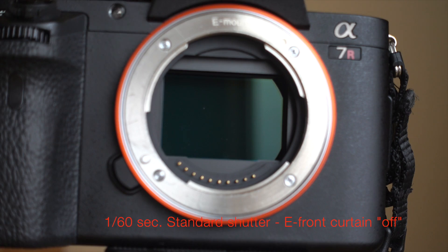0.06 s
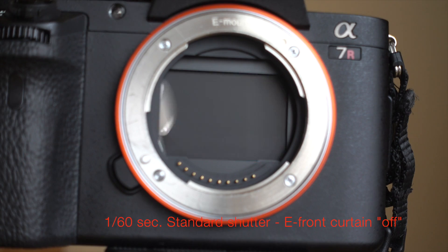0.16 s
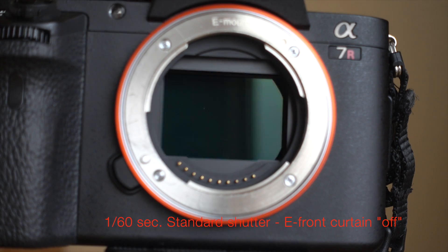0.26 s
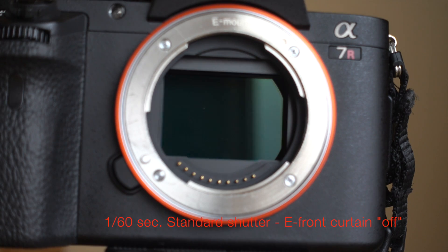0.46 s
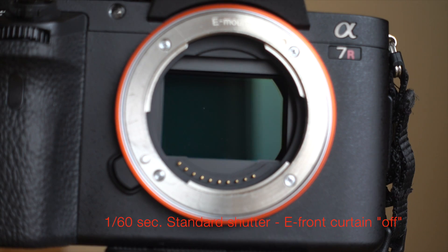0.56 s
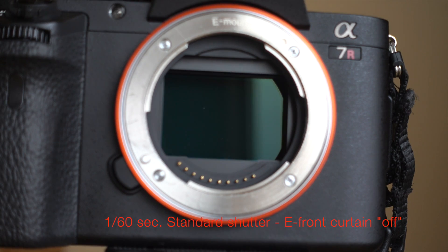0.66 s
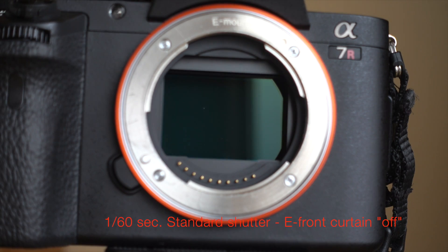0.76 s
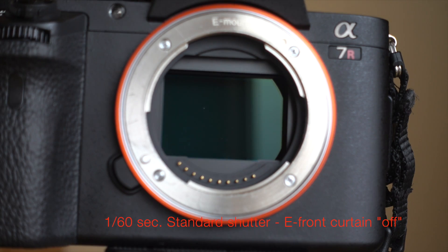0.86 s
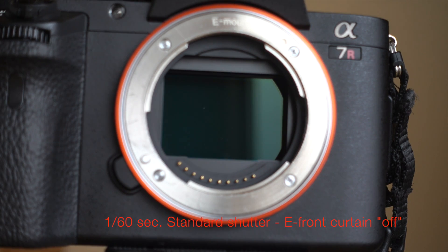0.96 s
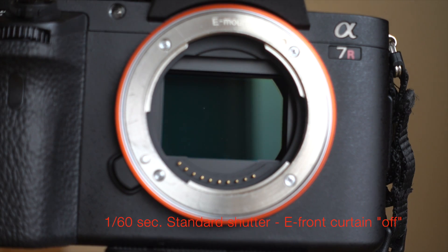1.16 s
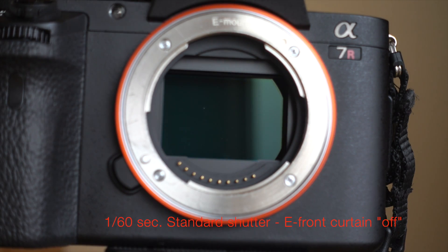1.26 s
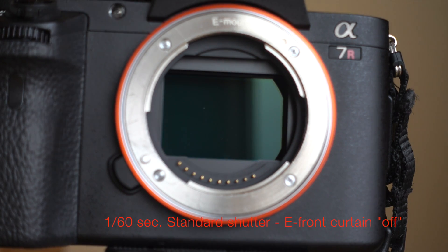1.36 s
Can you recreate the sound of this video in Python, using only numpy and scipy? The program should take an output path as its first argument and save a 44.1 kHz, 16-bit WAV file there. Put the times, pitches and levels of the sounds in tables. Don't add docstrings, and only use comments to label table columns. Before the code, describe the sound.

One mechanical camera shutter cycle in a small quiet room, heard close: faint rustle, crisp clack and clicking latches, tiny gear whirr re-cocking, another sharp clack, then a short reverberant tail over soft hiss and hum.

```python
import sys
import numpy as np
from scipy import signal
from scipy.fft import rfft, irfft, next_fast_len
from scipy.io import wavfile
from scipy.ndimage import uniform_filter1d, map_coordinates

SR = 44100
rng = np.random.default_rng(int(sys.argv[2]) if len(sys.argv) > 2 else 0)


def volts_from_db(level):
    exponent = np.asarray(level, float) / 20
    return 10 ** exponent


def transcribe(u):
    v = np.clip(np.atleast_2d(u).T, -1, 1)
    q = np.round(v * 32767).astype(np.int16)
    wavfile.write(sys.argv[1], SR, q)


N = 61739
OPPOSED = np.array([[1], [-1]])


def along(points, hz):
    f, v = np.transpose(points)
    return np.interp(np.log(hz + 1), np.log(f + 1), v)


def wobble(rate_hz):
    return map_coordinates(rng.standard_normal(N // 8), [np.arange(N) * rate_hz / SR])


def filtered(x, response):
    m = next_fast_len(N + SR // 2)
    return irfft(rfft(x, m) * response(np.fft.rfftfreq(m, 1 / SR)), m)[..., :N]


def tone(points):
    def response(hz):
        gain = volts_from_db(along(points, hz)) * np.minimum(1, hz / points[0][0]) ** 4
        return gain / np.sqrt(np.mean(gain ** 2))
    return response


def even(burst):
    z = rfft(burst)
    power = uniform_filter1d(abs(z) ** 2, size=len(z) // 32)
    flat = irfft(z / np.sqrt(power + 1e-30), len(burst))
    return flat * np.linalg.norm(burst) / np.linalg.norm(flat)


def rattles(rows, colour):
    rise_s, fall_s, spiky_db, sag_db = .00025, .0009, 4, 5
    u = np.maximum(np.arange(-256, 768) / SR, 0)
    out = np.zeros(N)
    for s, db, hold in rows:
        contacts = np.sign(rng.standard_normal(len(u)))
        contacts = contacts * volts_from_db(spiky_db * rng.standard_normal(len(u)))
        onset = 1 - np.exp(-u / rise_s)
        decay = np.exp(-np.maximum(u - hold, 0) / fall_s)
        shape = volts_from_db(db - sag_db * np.minimum(u / hold, 1)) * onset * decay
        out[round(s * SR) - 256:][:len(u)] += even(shape * contacts)
    return filtered(out, tone(colour))


def air():
    # f/Hz, level/dB
    air_tone = [(70, -15), (170, -12), (420, -3.5), (900, -4), (2600, -5.5), (4500, -14), (9000, -15),
                (16000, -21)]
    # f/Hz, side under mid/dB
    air_side = [(60, -30), (200, -29.5), (400, -12.5), (1000, -5), (4000, 1), (15000, -1.5)]
    # f/Hz, level/dB, sway/dB
    hum_lines = [(120, -72, 1.7), (98, -80.5, 4.5), (89, -92, -5), (250, -84.5, 2), (346.3, -73.5, 4),
                 (359.4, -74, 4), (447, -82, 2)]
    # t/s, level/dB
    drift = [(0, -1), (.3, 1.5), (.75, 4), (1.0, 0), (1.4, -1.5)]
    t = np.arange(N) / SR
    colour = tone(air_tone)
    mid = filtered(rng.standard_normal(N), colour)
    side = filtered(rng.standard_normal(N), lambda f: colour(f) * volts_from_db(along(air_side, f)))
    hum = np.zeros(N)
    for hz, db, sway_db in hum_lines:
        phase = 2 * np.pi * hz * t + 0.5 * sway_db * wobble(7.8)
        hum += volts_from_db(db + sway_db * wobble(12)) * np.sin(phase)
    hiss = volts_from_db(-64.5 + 0.47 * wobble(36)) * (mid + side * OPPOSED)
    return volts_from_db(np.interp(t, *np.transpose(drift))) * (hiss + hum)


def wake():
    # start t/s, first rise done t/s, peak t/s, level/dB
    rustle = (.186, .198, .228, -53)
    # f/Hz, level/dB
    wake_tone = [(710, -43), (1200, -24.5), (4080, 5), (5020, -20), (6100, -9.5), (7490, -1.5),
                 (9010, -8.5), (11800, -11), (16000, -27)]
    a, full, b, db = rustle
    on = np.interp(np.arange(N) / SR, [a, full, b, b + 0.0056], [0, 0.85, 3.2, 0.048])
    return on * volts_from_db(db) * filtered(rng.standard_normal(N), tone(wake_tone))


def whir():
    # t/s, level/dB
    motion = [(.226, -90), (.244, -46), (.255, -38), (.3, -41), (.35, -43), (.43, -46), (.46, -38),
              (.51, -38), (.55, -44), (.575, -70)]
    # f/Hz, level/dB
    whir_tone = [(290, -73), (500, -36.5), (1950, -6), (2650, -15), (5970, -24), (7420, -5), (10400, -12.5),
                 (11500, -16), (16000, -10.5)]
    s, db = np.transpose(motion)
    level_db = np.interp(np.arange(N) / SR, s, db, left=-120, right=-120)
    roughness_db = 1.2 * wobble(500)
    return volts_from_db(level_db + roughness_db) * filtered(rng.standard_normal(N), tone(whir_tone))


def curtain_slaps():
    # t/s, level/dB, rattle/s
    slaps = [
        (.2275, -32, .005),
        (.2505, -33, .003),
        (.3015, -33, .005),
        (.3101, -14, .0045),
        (.4835, -30, .004),
        (.505, -31, .004),
        (.5130, -13.5, .0045),
    ]
    # f/Hz, level/dB
    slap_tone = [(500, -28), (1200, -14), (2400, -14.5), (3600, -4.5), (6900, -2), (8300, -4.5),
                 (12000, -3.5), (16000, -0.5)]
    return rattles(slaps, slap_tone)


def cam_knocks():
    # t/s, level/dB, rattle/s
    knocks = [
        (.2285, -49.5, 0.0023),
        (.357, -29, 0.0024),
        (.3955, -30, 0.0052),
        (.5595, -32, 0.0037),
    ]
    # f/Hz, level/dB
    knock_tone = [(500, -30), (750, -9), (1200, -1.5), (1600, -9), (2100, -2.5), (3000, -15.5), (8000, -17),
                  (16000, -43)]
    return rattles(knocks, knock_tone)


def latches():
    # t/s, level/dB, rattle/s
    snaps = [
        (.2335, -31.5, 0.00051),
        (.342, -31, .002),
        (.3478, -16.5, 0.0025),
        (0.5, -31, 0.0011),
        (.5510, -15, 0.0023),
    ]
    # f/Hz, level/dB
    latch_tone = [(290, -50), (500, -31.5), (1190, -21), (2290, 0.5), (3650, -8.5), (7980, 2), (10200, -9),
                  (13400, -8.5), (16000, -18)]
    return rattles(snaps, latch_tone)


def frame_stops():
    # t/s, level/dB, rattle/s
    stops = [
        (.2425, -34, 0.0056),
        (.373, -32, .002),
        (.3788, -17.5, 0.0049),
    ]
    # f/Hz, level/dB
    stop_tone = [(240, -46.5), (400, -24), (1070, -5), (4240, 4.5), (5430, -7), (7750, 6), (9760, -5.5),
                 (13300, -1), (16000, -6)]
    return rattles(stops, stop_tone)


def motor():
    # start t/s, end t/s, first f/Hz, settled f/Hz, level/dB
    runs = [
        (.243, .309, 4080, 3697, -33),
        (.439, .514, 4120, 3125, -30.5),
    ]
    settle_s = [.021, .044]
    overtone_db = [
        [-14, -1, 1, -9, -30],
        [-14, 0, -3, -7, -7],
    ]
    fade_db_per_s = [-30, -25]
    edge_s = .005
    t = np.arange(N) / SR
    out = np.zeros(N)
    for run, settle, levels, fade in zip(runs, settle_s, overtone_db, fade_db_per_s):
        a, b, first_hz, end_hz, db = run
        u = np.clip((t - a) / settle, 0, 1)
        sag = (1 - u) ** 1.6 * (1 + 0.71 * u)
        phase = 2 * np.pi * np.cumsum(end_hz + (first_hz - end_hz) * sag) / SR
        on = np.clip((t - a) / edge_s, 0, 1) * np.clip((b - t) / edge_s, 0, 1)
        for k, level_db in enumerate(levels):
            faded_db = max(k - 1, 0) * fade * np.clip(t - a, 0, b - a)
            flutter_db = 2 * wobble(130)
            out += on * volts_from_db(db + level_db + faded_db + flutter_db) * np.sin((k + 1) * phase)
    return out


def cams_engaging():
    # t/s, level/dB, rattle/s
    cams = [
        (.2505, -37, .002),
        (.3005, -37, .002),
        (.4525, -25, .004),
        (.501, -34, .003),
    ]
    # f/Hz, level/dB
    cam_tone = [(600, -20), (1150, -10), (2500, 0), (3900, -4), (4800, -16), (9000, -22), (16000, -30)]
    return rattles(cams, cam_tone)


def late_tap():
    # t/s, level/dB, rattle/s
    tap = [
        (1.0735, -57, .002),
    ]
    # f/Hz, level/dB
    tap_tone = [(1500, -12), (2800, -3), (3400, 6.5), (5000, -10), (9000, -13.5)]
    return rattles(tap, tap_tone)


def body(f):
    # f/Hz, width/Hz, level/dB
    shell = [(1204, 41, 6.5), (1282, 68, 6.5), (1330, 24, 0.5), (2000, 180, 0), (2563, 83, -2),
             (3336, 98, 0), (5251, 53, 5), (6350, 52, 1.5), (8120, 180, -9.5), (9440, 130, 5),
             (10330, 140, -0.5), (12600, 430, -12)]
    return 1 + sum(volts_from_db(db) * 1j * f * w / (c * c - f * f + 1j * f * w) for c, w, db in shell)


def room(x):
    # f/Hz, t60/s
    room_t60 = [(500, 0.43), (1200, 0.45), (2500, 0.46), (5300, 0.51), (9000, 0.4), (15000, 0.3)]
    # f/Hz, level/dB
    room_tone = [(500, -3.5), (1200, 3.5), (1600, 0.5), (2150, 1.5), (3500, -2), (5300, 2.5), (7000, -2.5),
                 (16000, 5.5)]
    # f/Hz, level/dB
    wall_tone = [(500, 0), (1200, 2), (2100, 2), (3800, -4), (5300, 0), (8000, 0), (11000, -4), (16000, -5)]
    # f/Hz, side under mid/dB
    room_wide = [(500, -13.5), (1200, -29), (3000, -12), (6000, -9.5), (15000, -12)]
    room_db, build_s = -2, .012
    linger_db, linger_t60, linger_top_hz = -30.5, 2.05, 4990
    wall_s, smear_s, wall_db = .0166, .0011, -2.5

    hz, t, z = signal.stft(rng.standard_normal((2, SR)), SR, nperseg=256)
    near = volts_from_db(-60 * t / along(room_t60, hz)[:, None])
    linger = volts_from_db(linger_db - 60 * t / linger_t60) / (1 + (hz[:, None] / linger_top_hz) ** 4)
    z = z * (near + linger) * volts_from_db(along(room_tone, hz))[:, None]
    tail = signal.istft(z, SR, nperseg=256)[1][:, :SR]
    t = np.arange(SR) / SR
    tail = tail * (1 - np.exp(-t / build_s))

    wall = np.sign(rng.standard_normal((2, SR))) * np.exp(-.5 * ((t - wall_s) / smear_s) ** 2)
    wall = np.array([even(w) for w in wall])

    late = signal.fftconvolve(x[None], tail / np.linalg.norm(tail[0]), axes=1)[:, :N]
    echo = signal.fftconvolve(x[None], wall / np.linalg.norm(wall[0]), axes=1)[:, :N]
    echo = filtered(echo, lambda f: volts_from_db(wall_db + along(wall_tone, f)))
    mid, side = volts_from_db(room_db) * late + echo
    return mid + filtered(side, lambda f: volts_from_db(along(room_wide, f))) * OPPOSED


def scene():
    blows = curtain_slaps() + cam_knocks() + latches() + frame_stops() + cams_engaging() + late_tap()
    shutter = filtered(blows + whir(), body) + motor() + wake()
    apart = filtered(shutter, lambda f: 1j * volts_from_db(-11) * f / (f + 4000) * (f > 2500))
    return shutter + apart * OPPOSED + room(shutter) + air()


def top_cut(x):
    return signal.sosfilt(signal.butter(12, 17070, fs=SR, output="sos"), x)


def record(dry):
    mix = filtered(dry, lambda hz: hz < 15800)
    return top_cut(mix)


dry = scene()
out = record(dry)
transcribe(out)
```